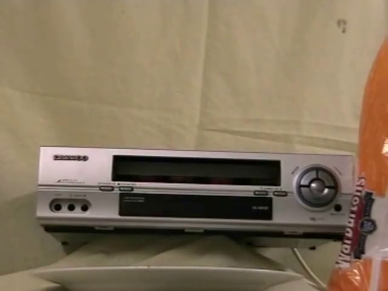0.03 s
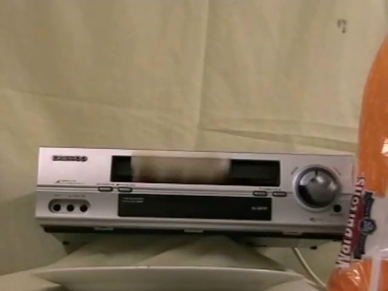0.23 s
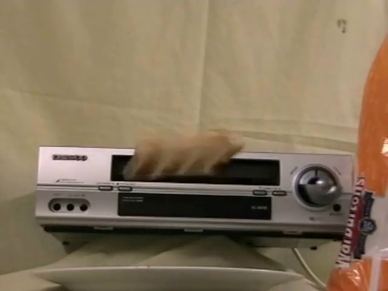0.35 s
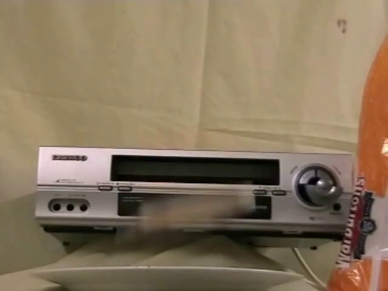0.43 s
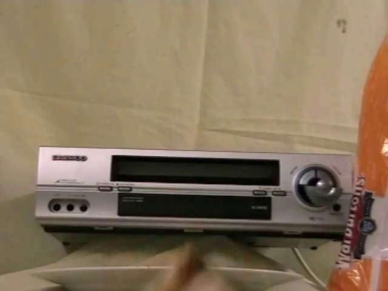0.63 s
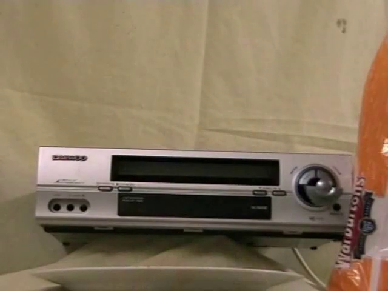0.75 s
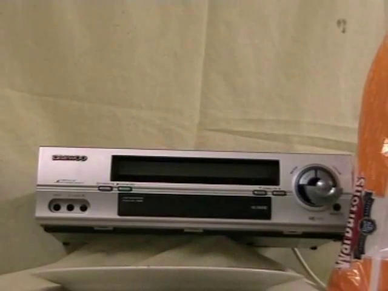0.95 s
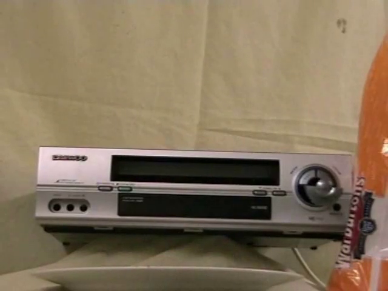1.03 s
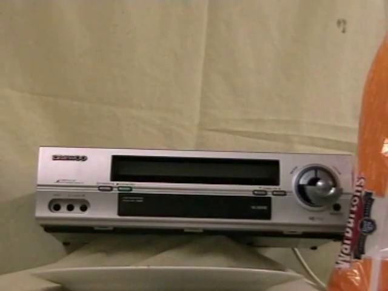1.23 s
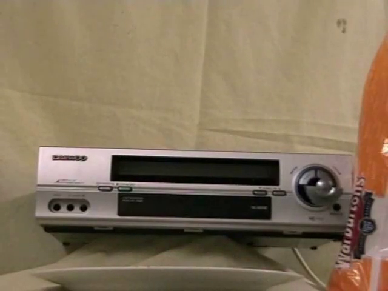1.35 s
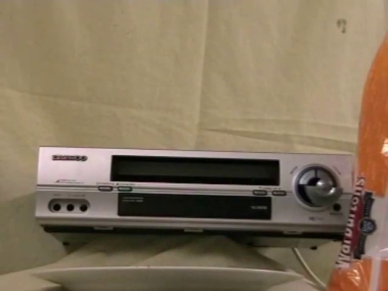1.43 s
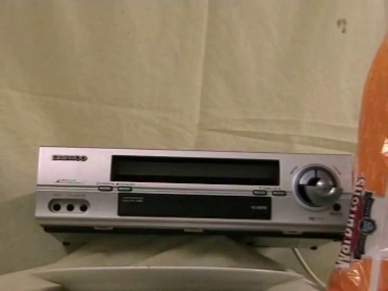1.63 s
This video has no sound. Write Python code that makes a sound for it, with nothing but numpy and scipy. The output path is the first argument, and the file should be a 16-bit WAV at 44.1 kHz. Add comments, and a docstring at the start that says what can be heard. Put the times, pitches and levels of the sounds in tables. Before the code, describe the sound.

A spring ejector throws toast with a harsh metallic rattle and flap slap, toast clinks crunchily on a china plate, then a dull case knock and sharp plastic clicks, close up in a small soft humming room.

```python
"""A small soft room with an appliance hum and hiss: a spring ejector in a thin metal case throws toast.
The carriage rattles and scrapes as random impulses through case resonances and a treble curve.
The flap slaps shut, the toast drops on a plate a metre away, and a knock on the case follows: each is
struck modes, with crackle for crust and loose parts. Damped wavelets make the latch clicks at the end.
A noise-built room echoes them all, and the loudest peaks flatten."""
import sys
import numpy as np
from scipy import signal
from scipy.fft import rfft, irfft
from scipy.io import wavfile

SR = 44100
rng = np.random.default_rng(int(sys.argv[2]) if len(sys.argv) > 2 else 0)


def wrap_up_sound(samples):
    """Save the sound to the file named by the first command line argument, as 16-bit audio."""
    columns = np.atleast_2d(samples).T
    # keep every value between -1 and 1, then stretch to whole-number steps
    tamed = np.clip(columns, -1, 1)
    steps = np.round(tamed * 32767).astype(np.int16)
    wavfile.write(sys.argv[1], SR, steps)


def gain_from_db(level_db):
    """Convert decibel levels to linear amplitude factors (20 dB per decade)."""
    decades = np.asarray(level_db, float) / 20
    return 10 ** decades


N = 74970
T = np.arange(N) / SR  # time in seconds


def unit(x):
    """Scale to rms 1."""
    return x / np.sqrt(np.mean(x ** 2))


def colour(x, curve):
    """Equalise a signal along (Hz, dB) points joined on a log frequency axis."""
    hz, db = np.array(curve, float).T
    f = np.maximum(np.arange(len(x) // 2 + 1) * SR / len(x), 1)
    gain = gain_from_db(np.interp(np.log(f), np.log(hz), db))
    return irfft(rfft(x) * gain, len(x))


def resonate(x, hz, width_hz):
    """Two-pole resonance, gain 1 at the centre."""
    b, a = signal.iirpeak(hz, hz / max(width_hz, 1), fs=SR)
    return signal.lfilter(b, a, x)


def decay(t, t60):
    """Exponential fade that loses 60 dB in t60 seconds."""
    return np.exp(-np.log(1000) * t / t60)


def dust(per_s, spread_db):
    """Dense random impulses of either sign and uneven size, at rms 1."""
    chance, sign, size = rng.random((3, N))
    sizes = gain_from_db(-spread_db * np.log(size + .03))
    return unit((chance < per_s / SR) * np.sign(sign - .5) * sizes)


def burst(rows, tone):
    """Fine crackle that starts at once and dies away."""
    fade = sum(gain_from_db(db) * (T > s) * decay(np.maximum(T - s, 0), t60) for s, t60, db in rows)
    return fade * unit(colour(dust(6000, 3.0), tone))


def ticks(rows):
    """Short damped wavelets with a rounded start."""
    out = np.zeros(N)
    for s, db, hz, cycles in rows:
        u = np.maximum(T - s, 0) * hz  # cycles since the start
        rise = 1 - np.exp(-u / .15)
        out += gain_from_db(db) * 2 * np.sin(2 * np.pi * u) * np.exp(-u / (cycles / 2)) * rise
    return out


def strike(modes, blows, scatter_db=1.5, rise_ms=.3):
    """Each blow rings all the modes, a little differently each time; long contact dulls the treble."""
    hz, db, t60 = np.array(modes, float).T[:, :, None]
    out = np.zeros(N)
    scatter = scatter_db * rng.standard_normal((len(blows), len(modes), 1))
    for (s, blow_db, contact_ms), mode_scatter in zip(blows, scatter):
        i = int(s * SR)
        t = T[:min(N - i, SR // 2)]
        soft = 1 / (1 + (hz * contact_ms / 1000) ** 2)
        level = gain_from_db(blow_db + db + mode_scatter) * soft
        ring = level * np.sin(2 * np.pi * hz * t) * decay(t, t60)
        out[i:i + len(t)] += ring.sum(axis=0) * (1 - np.exp(-t * 1000 / rise_ms))
    return out


# The throw. Each row: time in seconds, level in dB of the rattle in the case, level in dB of the scrape.
EJECT_LEVELS = [(.205, -41, -45), (0.221, -32, -32), (0.228, -29, -34), (.231, -19.5, -18),
                (0.252, -19.5, -28), (.269, -11, -11), (0.288, -16.5, -21), (.337, -20, -24),
                (.4, -25, -26.5), (.463, -31.5, -30.5), (0.489, -20, -33.5), (.51, -34.5, -40),
                (0.533, -23, -38)]
# Resonances of the thin metal case. Each row: frequency in Hz, width in Hz, relative level in dB.
CASE_RESONANCES = [(258, 190, -20), (469, 107, 3.5), (657, 110, 2.5), (722, 170, -0.5), (1100, 91, -4),
                   (1407, 99, -3), (1720, 175, -4), (2190, 220, -5), (2675, 260, -8.5), (3220, 620, -18.5)]
# Tone of bread scraping the slot. Each row: frequency in Hz, relative level in dB.
SCRAPE_TONE = [(1180, -52), (2000, 1), (2670, -17), (3110, -7), (3980, -2.5), (4750, -6), (11500, -10.5),
               (15200, -14)]
# Carriage jolts. Each row: start in seconds, level in dB, frequency in Hz, length in cycles.
CARRIAGE_JOLTS = [(.229, -15, 3500, 2.), (.252, -10, 700, 2.), (.2553, -6, 900, 1.5),
                  (.2616, -3, 1500, 2.5), (.2685, -4, 1400, 3.), (.2705, -8, 11000, 6.),
                  (.2708, -6, 4000, 3.), (.2745, -6, 1600, 2.), (.2915, -7, 800, 1.5),
                  (.302, -10, 1500, 1.5), (.3235, -10, 700, 2.), (.329, -10, 500, 2.),
                  (.386, -24, 12500, 8.)]


def ejector():
    """Rattling parts excite the case resonances, bread scrapes the slot and the carriage jolts."""
    s, rattle_db, scrape_db = np.array(EJECT_LEVELS, float).T
    rattle_level = gain_from_db(np.interp(T, s, rattle_db, left=-120, right=-120))
    scrape_level = gain_from_db(np.interp(T, s, scrape_db, left=-120, right=-120))
    hits = dust(per_s=5000, spread_db=3.5)
    rattle = np.zeros(N)
    for k, (hz, width_hz, db) in enumerate(CASE_RESONANCES):
        rattle += (-1) ** k * gain_from_db(db) * resonate(hits, hz, width_hz)  # neighbours in opposite polarity
    scrape = colour(dust(per_s=14000, spread_db=3), [(700, -51)] + SCRAPE_TONE)
    return unit(rattle) * rattle_level + unit(scrape) * scrape_level + ticks(CARRIAGE_JOLTS)


def spring():
    """A thin spring sings on: a very narrow noise band that starts at once and fades."""
    start_s, hz, width_hz, level_db, t60_s = .385, 6713, 15, -48, 2.
    tone = unit(resonate(rng.standard_normal(N), hz, width_hz))
    return gain_from_db(level_db) * (T > start_s) * decay(T - start_s, t60_s) * tone


# Modes of the flap. Each row: frequency in Hz, relative level in dB, 60 dB decay in seconds.
FLAP_MODES = [(174, -9, 0.13), (252, -18.5, 0.093), (540, -7, 0.05), (700, -4, 0.06), (710, -3, 0.025),
              (784.5, -5.5, 0.089), (940, -20, 0.037), (1680, -6.5, 0.029), (2150, -19, 0.035),
              (2630, -8, .04)]
# The flap slapping shut. Each row: start in seconds, level in dB, contact in milliseconds.
SLAPS = [(.4675, -11.5, 0.28), (.4715, -12, 0.31), (.4755, -11.5, 1), (.4821, -10, 0.67),
         (.4888, -21.5, 0.87)]


def flap():
    """The flap slaps shut in a quick run of blows that ring its modes."""
    return strike(FLAP_MODES, SLAPS)


# Modes of the china plate. Each row: frequency in Hz, relative level in dB, 60 dB decay in seconds.
PLATE_MODES = [(483, -12, 0.053), (651.5, -6, 0.19), (694, -2.5, 0.11), (1360, -4.5, 0.056),
               (1323, -9.5, 0.54), (1880, 0, 0.18), (2080, -9.5, 0.38), (2160, -1, 0.045),
               (2840, -14.5, 0.41), (2883, -1, 0.16), (3604, -2.5, 0.18), (3720, 0, .14), (4270, -6, 0.073),
               (4600, -9, 0.2), (5640, -7, 0.15), (6200, -24, 0.17), (6630, -18, 0.25), (7700, -24.5, 0.4),
               (8312, -26, .15), (9211, -17.5, 0.11), (9889, -24, .14), (10640, -11, 0.1),
               (10800, -22, 0.068), (11540, -20, .1), (11900, -19, .1), (13680, -25, .12)]
# Toast landing and tipping. Each row: start in seconds, level in dB, contact in milliseconds.
TOAST_HITS = [(.5388, -21, .1), (.5455, -28, .4), (.5515, -13.5, .09), (.5578, -23, .05), (.5622, -7, 1.7),
              (.598, -30, .2), (.9619, -18, 1.1)]
# Crust crunch on the plate. Each row: start in seconds, 60 dB decay in seconds, starting level in dB.
CRUST_CRUNCH = [(.539, 0.097, -19.5), (.5518, 0.034, -19), (.562, 0.62, -27)]


def plate():
    """Crust meets china: edge, flat, settle, and a late tip-over; each mode has a longer-ringing twin."""
    split, twin_db, twin_ring = .007, -13, 1.7  # frequency offset as a ratio, dB, decay factor
    twins = [(hz * (1 + split), db + twin_db, t60 * twin_ring) for hz, db, t60 in PLATE_MODES]
    crunch_tone = [(200, 1), (700, 4), (2200, 5.5), (4500, -3.5), (5200, -18), (7000, -12),
                   (11500, -17), (14000, -38)]  # (Hz, relative dB)
    ring = strike(PLATE_MODES + twins, TOAST_HITS, scatter_db=2.5, rise_ms=0.2)
    return ring + burst(CRUST_CRUNCH, crunch_tone)


# Modes of the case panel. Each row: frequency in Hz, relative level in dB, 60 dB decay in seconds.
PANEL_MODES = [(262, -17.5, 0.21), (372, -12.5, 0.071), (724, -4.5, 0.04), (810, -4.5, 0.059),
               (984, -7, 0.039), (1480, -3.5, 0.026), (1587, 0, .016), (2480, -25, 0.039),
               (2820, -17, 0.026), (4400, -10, 0.017)]
# Blows on the panel. Each row: start in seconds, level in dB, contact in milliseconds.
PANEL_BLOWS = [(0.9621, -10, .12), (.9685, -8, 0.57)]
# Crack of the knock. Each row: start in seconds, level in dB, frequency in Hz, length in cycles.
CRACK = [(.9611, -14, 8000, 3.), (.9613, -16, 10500, 3.), (.9614, -13, 2500, 1.5)]
# Loose parts shaken by the knock. Each row: start in seconds, 60 dB decay in seconds, starting level in dB.
LOOSE_PARTS = [(.9611, .02, -18.5), (.9615, 0.11, -24.5)]
# Tone of the loose parts. Each row: frequency in Hz, relative level in dB.
LOOSE_PARTS_TONE = [(200, -27), (400, -9), (800, 6), (1600, -0.5), (2800, 7), (5000, -16.5), (8800, -2),
                    (13400, -19), (15500, -40)]


def knock():
    """A dull blow rings the case panel, with a short crack on top and a buzz of loose parts."""
    return strike(PANEL_MODES, PANEL_BLOWS) + ticks(CRACK) + burst(LOOSE_PARTS, LOOSE_PARTS_TONE)


# Latch clicks. Each row: start in seconds, level in dB, frequency in Hz, length in cycles.
LATCH_CLICKS = [(1.3543, 2, 3300, 1.8), (1.3546, -12, 10000, 2.), (1.3607, -11, 3600, 4.),
                (1.3636, -5, 2500, 1.8), (1.3637, -7, 5300, 2.5), (1.3705, -14, 3000, 2.),
                (1.3849, 1, 4200, 1.2), (1.3852, -10, 10000, 2.), (1.3855, -1, 1900, 1.3),
                (1.3935, -8, 2500, 1.2), (1.4105, -15, 2500, 1.5), (1.4139, -5, 3600, 1.3),
                (1.4205, -14, 3500, 2.), (1.471, -19, 2300, 2.), (1.4775, -25, 2500, 2.),
                (1.5016, -8, 3700, 1.4), (1.508, -17, 3500, 2.), (1.5145, -23, 2500, 1.5)]
# Modes of the latch. Each row: frequency in Hz, relative level in dB, 60 dB decay in seconds.
LATCH_MODES = [(520, 10, .04), (970, 8, .03), (1600, 8, .02), (2070, 10, .025), (2500, 10, .025),
               (3500, 10, .018), (4150, 6, .012), (5300, 8, .01)]
# Fine chatter after the clicks. Each row: start in seconds, 60 dB decay in seconds, starting level in dB.
LATCH_CHATTER = [(1.3515, .03, -30), (1.3552, .12, -25), (1.3855, .19, -21), (1.5022, .2, -33)]
# Tone of the chatter. Each row: frequency in Hz, relative level in dB.
LATCH_CHATTER_TONE = [(180, -28), (300, -48), (507, -20), (801, 1.5), (975, -8), (3550, 1.5), (13800, -20),
                      (15000, -43)]


def latch():
    """Sharp plastic clicks, each ringing the latch modes briefly, with fine chatter after them."""
    ring_db, contact_ms = -33, .05  # ring level relative to its click
    blows = [(s, db + ring_db, contact_ms) for s, db, _, _ in LATCH_CLICKS]
    ring = strike(LATCH_MODES, blows, scatter_db=3.4)
    return ticks(LATCH_CLICKS) + ring + burst(LATCH_CHATTER, LATCH_CHATTER_TONE)


# Echo bands of the room. Each row: centre in Hz, 60 dB decay in seconds, level in dB.
ROOM_BANDS = [(296, 0.31, -18), (910, 0.24, -13), (3400, 0.19, -10.5), (7000, 0.18, -6.5)]
# Stereo spread of the echo. Each row: frequency in Hz, side level relative to mid in dB.
ROOM_SPREAD = [(200, -16), (600, -10), (2000, -2), (8000, -5), (13000, 3)]


def room(x):
    """Walls return a diffuse decay: fading noise per band, partly different left and right."""
    gap_s = 0.0012  # silence before the first echo
    t = T[:SR // 2]
    echoes = []
    for noise in rng.standard_normal((2, len(t))):
        response = np.zeros(len(t))
        for hz, t60, db in ROOM_BANDS:
            band = resonate(resonate(noise, hz, hz), hz, 1.24 * hz)
            band = band * decay(t, t60) * (t > gap_s)
            response += gain_from_db(db) * band / np.sqrt(np.sum(band ** 2))
        echoes.append(signal.fftconvolve(x, response)[:N])
    mid, side = echoes
    return mid + colour(side, ROOM_SPREAD) * np.array([[1], [-1]])


def cloth_rustle():
    """Cloth settles: bright noise that swells and fades along a bell curve."""
    centre_s, half_s, level_db = .785, .04, -45
    noise = colour(rng.standard_normal(N), [(800, -12), (3000, 12), (9000, 8), (14000, -5)])
    return gain_from_db(level_db) * np.exp(-((T - centre_s) / half_s) ** 2) * unit(noise)


# Hum bands. Each row: centre in Hz, width in Hz of the narrower of two filters, rms level in dB.
HUM_BANDS = [(125, 9, -66), (164, 30.4, -39), (199, 10.4, -40), (245.3, 16.7, -37.5), (358.5, 23, -49.5),
             (476.2, 17.5, -43)]
# Steady-pitched hum tones. Each row: frequency in Hz, rms level in dB before the waver.
HUM_TONES = [(49.5, -55), (99, -44.5)]


def appliance_hum():
    """Narrow noise bands that waver by nature, plus low tones under a slow random waver in level."""
    bands = np.zeros(N)
    for hz, width_hz, db in HUM_BANDS:
        noise = rng.standard_normal(N)
        bands += gain_from_db(db) * unit(resonate(resonate(noise, hz, width_hz), hz, 2 * width_hz))
    waver = 1 + 0.43 * unit(resonate(rng.standard_normal(N), 2.0, 5.6))
    tones = sum(gain_from_db(db) * np.sqrt(2) * np.sin(2 * np.pi * hz * T) for hz, db in HUM_TONES)
    return bands + waver * tones


# Tone of the hiss. Each row: frequency in Hz, relative level in dB.
HISS_TONE = [(35, -53), (60, -18.5), (246, -3), (318, -12.5), (482, -12), (594, -17), (1010, -19),
             (1220, -22), (4560, -29), (15200, -45.5)]
# Stereo spread of the hiss. Each row: frequency in Hz, side level relative to mid in dB.
HISS_SPREAD = [(40, -10), (100, -18), (250, -21), (500, -9), (2000, -8), (8000, -6.5), (13000, -5)]


def hiss():
    """Shaped noise, nearly alike in both ears in the bass and wider in the treble."""
    mid, side = [colour(noise, HISS_TONE) for noise in rng.standard_normal((2, N))]
    gain = gain_from_db(-34.5) / np.std(mid)  # rms level of the mid in dB
    return gain * (mid + colour(side, HISS_SPREAD) * np.array([[1], [-1]]))


def scene():
    """Case and plate, thinned in the bass, with their room echo over rustle, hum and hiss."""
    case = ejector() + spring() + flap() + knock() + latch()
    b, a = signal.butter(2, 186, "high", fs=SR)  # little bass reaches the microphone from them
    case, china = signal.lfilter(b, a, [case, plate()])
    # less of the plate comes back from the walls
    echo = room(case + gain_from_db(-7) * china)
    return case + china + echo + cloth_rustle() + appliance_hum() + hiss()


def low_pass(x):
    """Removes everything above the highest recorded frequency."""
    return signal.sosfilt(signal.butter(12, 15340, fs=SR, output="sos"), x)


def record(dry):
    """A small constant offset shifts the wave, then peaks beyond full scale are cut flat."""
    mix = np.clip(dry + 0.0093, -1, 1)
    return low_pass(mix)


dry = scene()
out = record(dry)
wrap_up_sound(out)
```